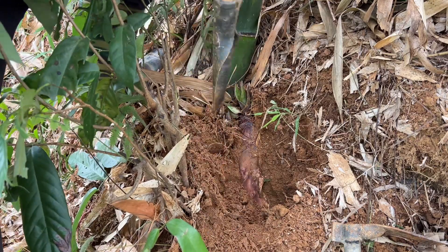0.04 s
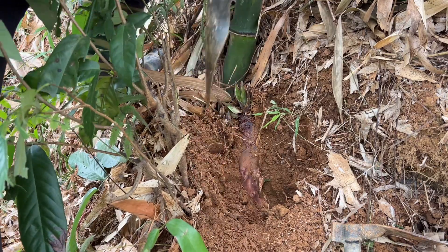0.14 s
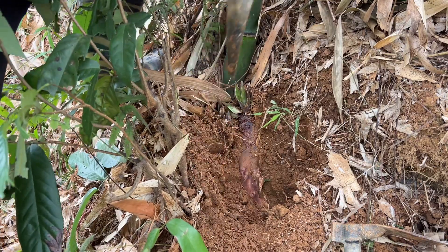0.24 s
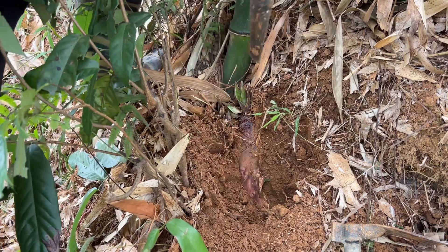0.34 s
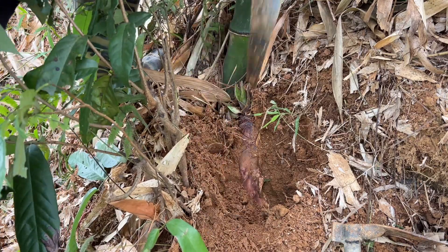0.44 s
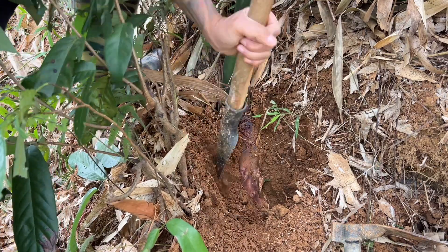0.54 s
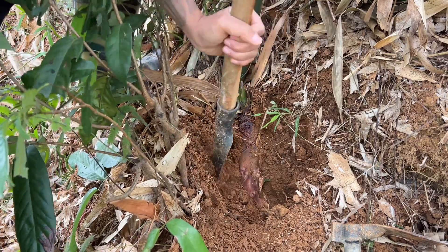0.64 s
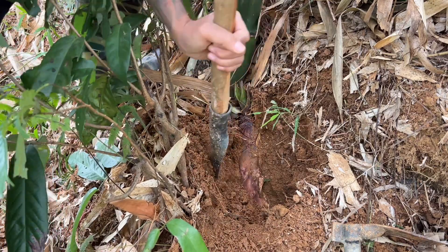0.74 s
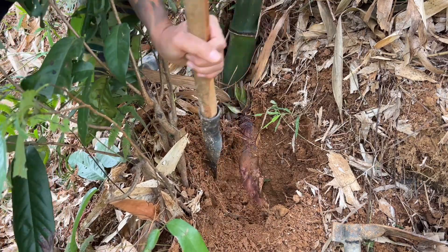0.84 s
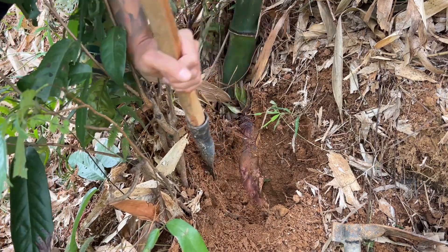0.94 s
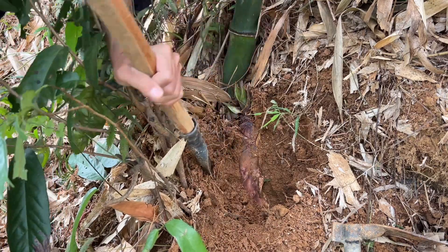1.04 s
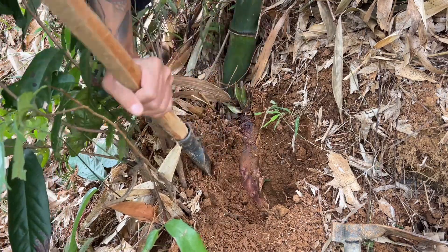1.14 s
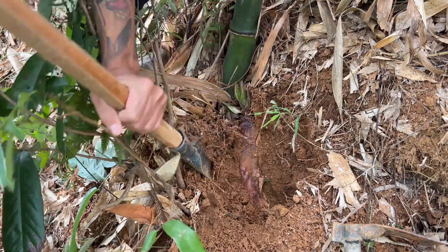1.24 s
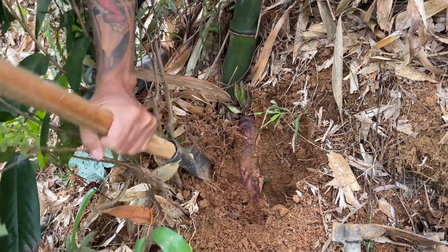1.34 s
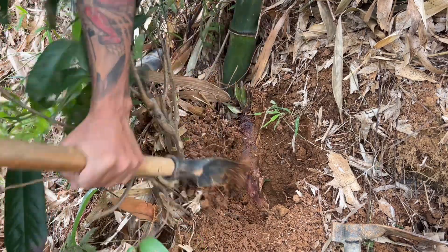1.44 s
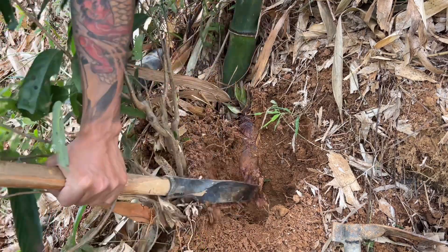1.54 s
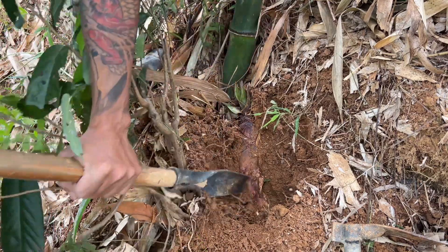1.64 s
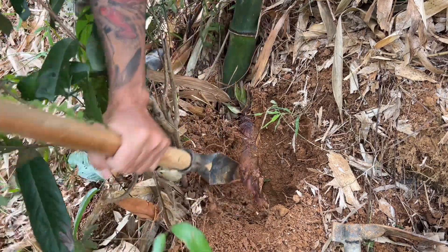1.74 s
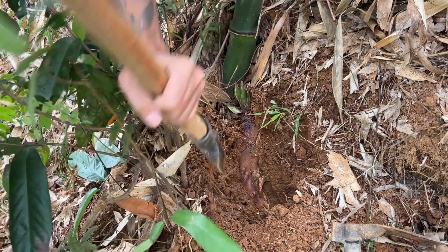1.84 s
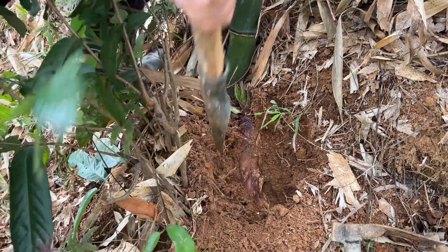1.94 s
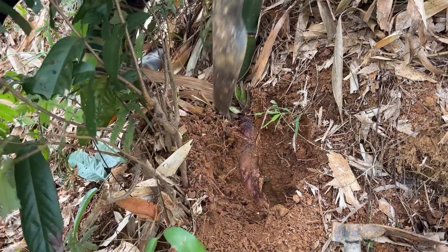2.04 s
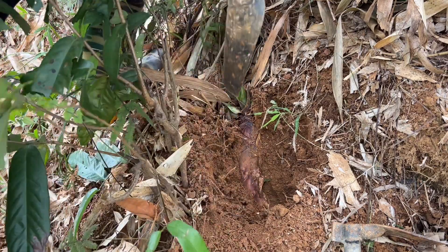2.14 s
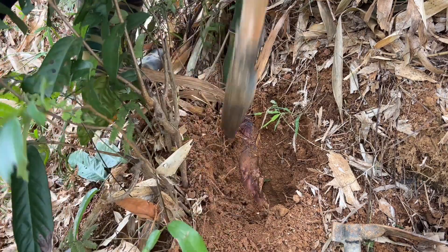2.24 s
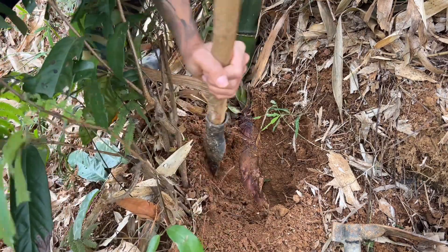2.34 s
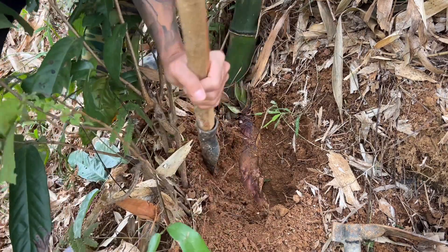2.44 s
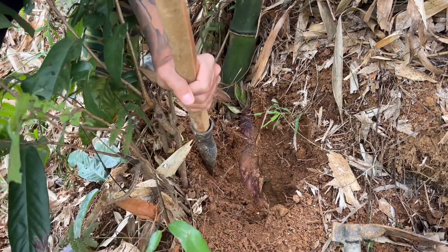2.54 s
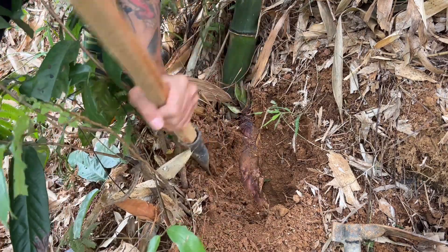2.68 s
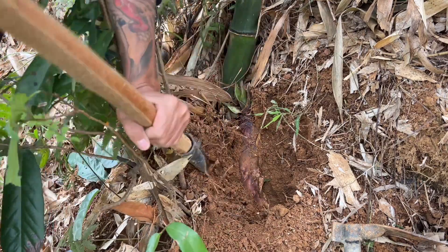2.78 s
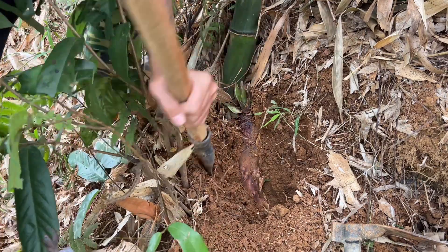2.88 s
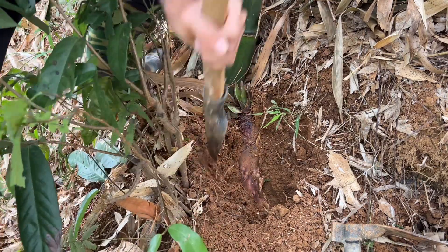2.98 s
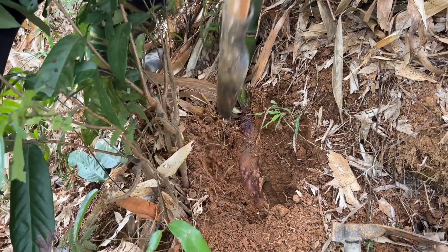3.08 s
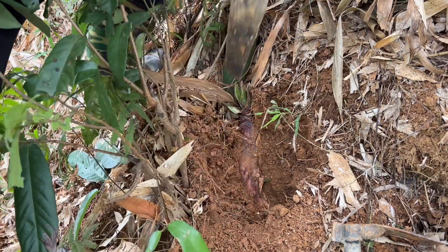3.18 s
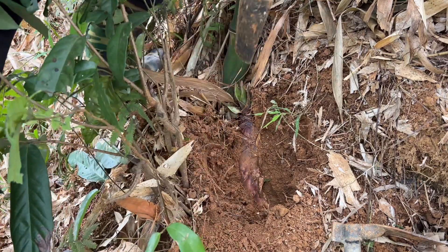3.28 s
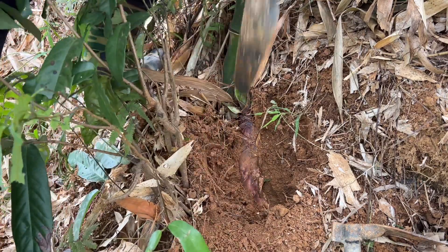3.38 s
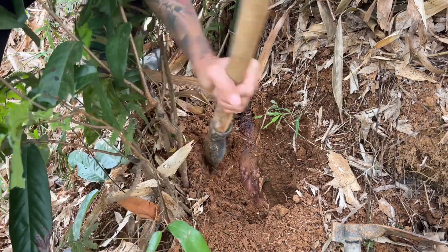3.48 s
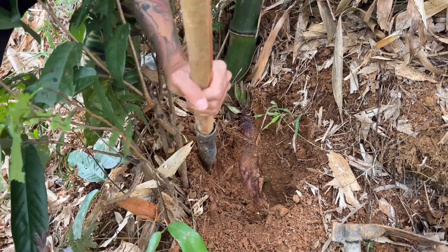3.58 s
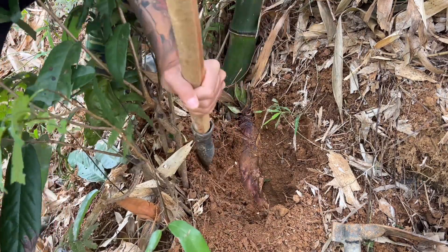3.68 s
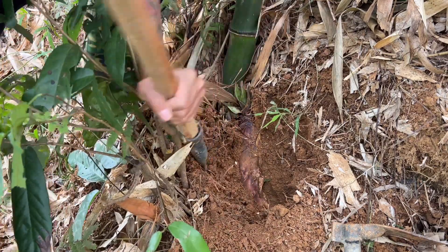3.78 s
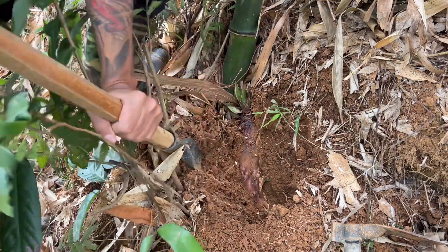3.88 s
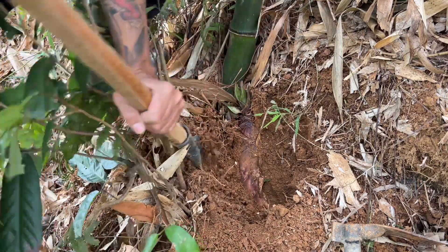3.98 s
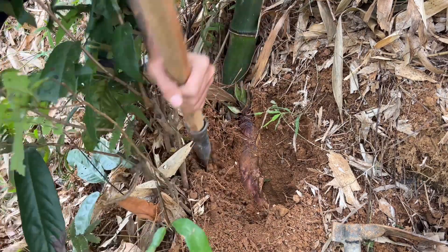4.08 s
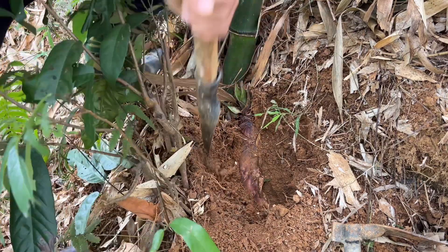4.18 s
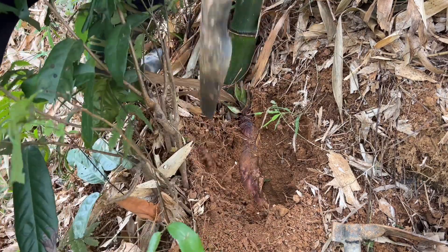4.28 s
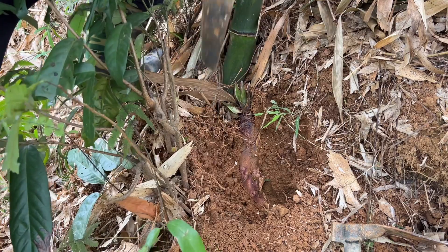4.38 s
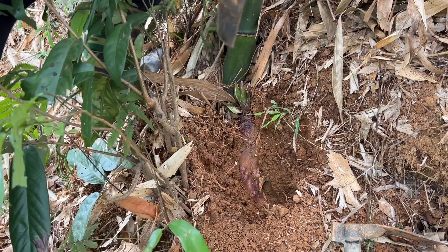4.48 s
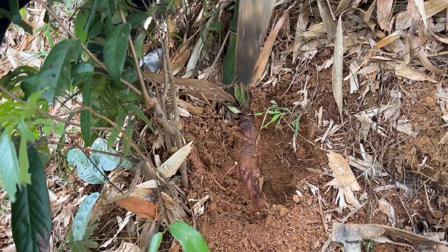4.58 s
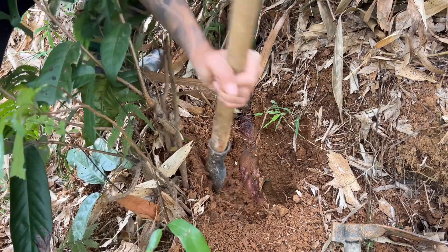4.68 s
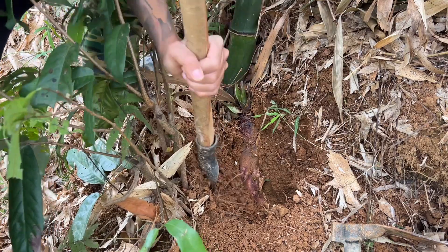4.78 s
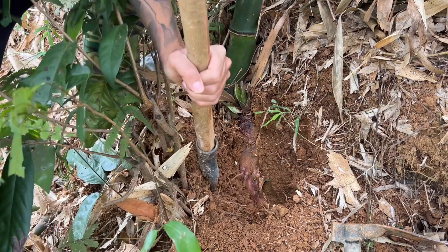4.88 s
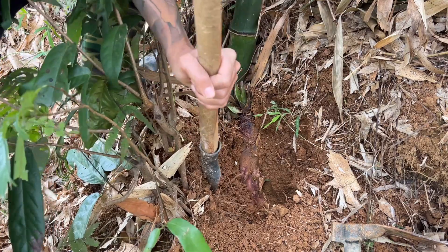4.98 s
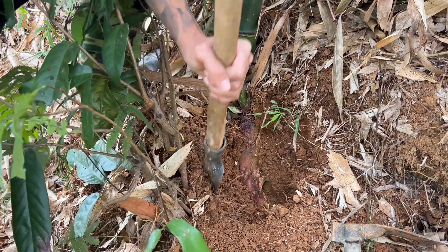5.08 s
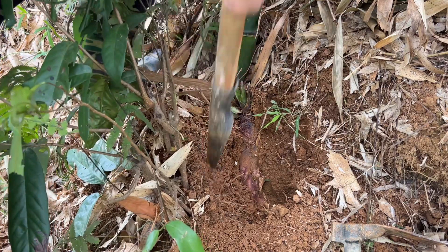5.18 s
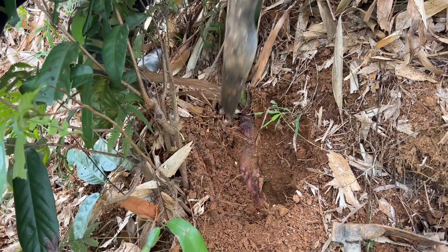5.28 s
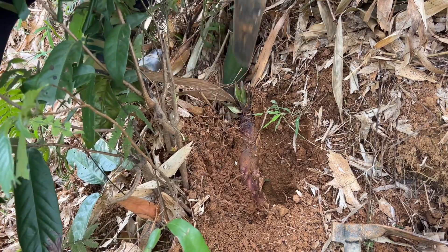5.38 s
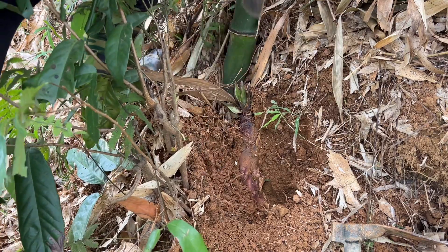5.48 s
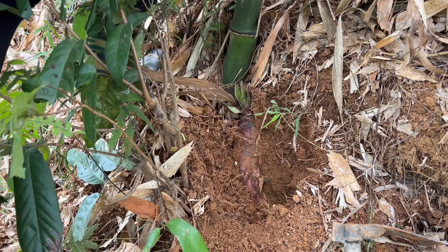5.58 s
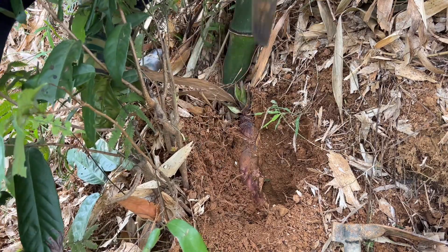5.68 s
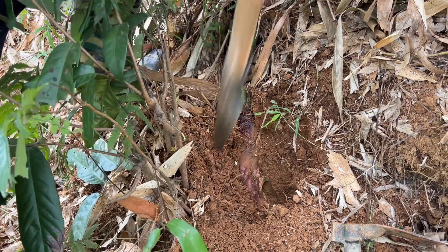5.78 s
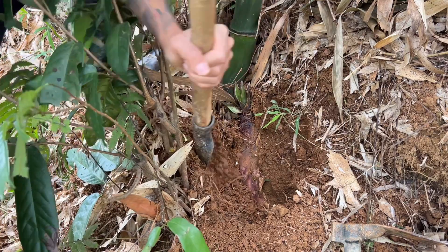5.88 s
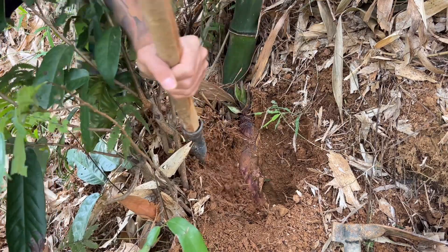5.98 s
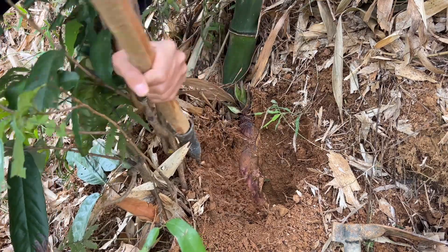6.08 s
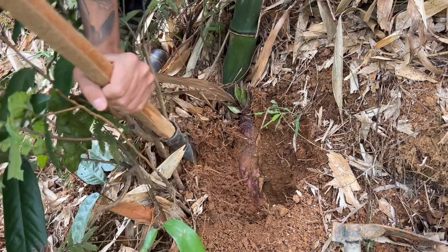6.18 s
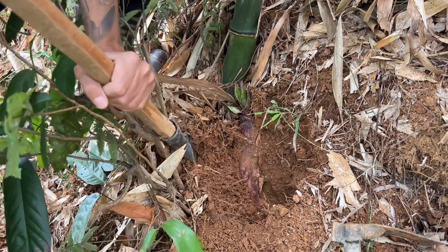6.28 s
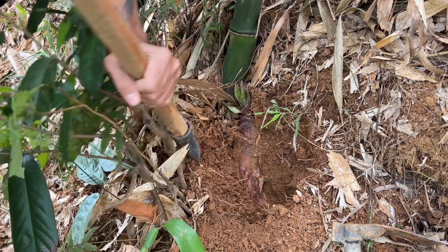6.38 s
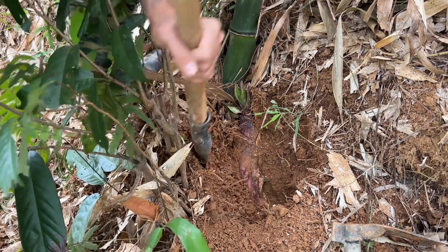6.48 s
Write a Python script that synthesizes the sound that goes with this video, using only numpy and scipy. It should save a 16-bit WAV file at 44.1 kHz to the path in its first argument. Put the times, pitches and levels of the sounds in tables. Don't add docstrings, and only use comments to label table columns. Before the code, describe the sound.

A hand-held stereo microphone is close to a hoe working loose soil in a grove. Faint leaf rustle and low air rumble open it. At 0.6 s the first blow crunches through grit with a crack and low thud; a faint wooden creak follows around 0.7-0.9 s. Around 1.3-1.8 s the blade is levered out: scraping, a strong root snap near 1.5, crumbling earth and crackling leaves. At 2.4 s comes the hardest, sharpest crack, then tearing fibres and knocking clods near 2.8. A quick, solid blow lands at 3.55 s, with scraping and snapping at 3.9 and rustling and faint steel ringing near 4.2 amid stronger rumble. At 4.76 s a lighter, brighter blow catches a root with a small double stop and scrape. The fifth, at 5.9 s, thuds deepest, followed by loud snaps at 6.04 and 6.28 before ending around 6.5 s.

```python
import sys
import numpy as np
from scipy import signal
from scipy.fft import rfft, irfft, next_fast_len
from scipy.io import wavfile
from scipy.ndimage import uniform_filter1d

SR = 44100
rng = np.random.default_rng(int(sys.argv[2]) if len(sys.argv) > 2 else 0)


def dump_mix(stems):
    frames = np.atleast_2d(stems).T
    limited = np.clip(frames, -1, 1)
    pcm = np.round(limited * 32767).astype(np.int16)
    wavfile.write(sys.argv[1], SR, pcm)


def nominal_scale(level):
    x = np.asarray(level, float) / 20
    return 10 ** x


N = 287864

# (stop [s], crack [dB], entry [ms], grit [dB])
BLOWS = [
    (0.6155, -9.5, 11, -23),
    (2.3815, -1, 10, -22),
    (3.5499, -7, 7.9, -20),
    (4.7572, -11, 10.5, -26),
    (5.9021, -3.5, 13.2, -21.5),
]
# (frequency [Hz], level [dB], t60 [s], delay [ms])
CRACK_MODES = [(640, -6, .04, -.15), (800, -6, .025, -.1), (1250, -10, .01, -.4), (3000, -13, .006, -1.6),
               (6200, -15, .005, -.6)]
# (level [dB], ..)
STRUCK = [(-5, 3, 2.5, -10, -14), (0.5, -6, -3, -7.5, -3), (4.5, -0.5, 6.5, -14.5, 6), (-6, -12, -4, 11, 3),
          (-4.5, -1.5, -2, 1.5, -20)]
# (frequency [Hz], level [dB])
SQUEALS = [(2800, -26), (1900, -12), (2170, -18), (2060, -19.5), (1850, -15.5)]
# (frequency [Hz], density [dB per Hz])
GRIT_SPECTRUM = [(300, -44.5), (800, 3), (2000, -1.5), (3000, 0.5), (4500, -6), (7000, -6.5), (10500, -4),
                 (16000, -23)]
# (frequency [Hz], arrival [ms], swell [ms], level [dB])
THUD_WAVES = [(325, 2.76, 3.7, -4.5), (225.4, 3.25, 5, 0.5), (420, 1.2, 2.2, -3.0)]
# (frequency [Hz], arrival [ms], swell [ms], level [dB])
GROUND_WAVES = [(81, 21.3, 10.0, -1), (127, 9.3, 5.5, -3.5), (70, 52.5, 14.5, -12), (52, 15.5, 15.5, -13)]
# (thud [dB], thud pitch [ratio], ground wave [dB], crack pitch [ratio], upper thud [dB])
ANSWERS = [(-18.5, 1.0, -22.5, 1.1, -3), (-15, 1.0, -19.5, 1.016, 0.5), (-16, 1.12, -17, 1.07, 3),
           (-19, 1.09, -24, 1.02, 1.5), (-8.5, 0.91, -19, 0.99, -3.5)]
# (thud delay [ms], thud swell [ratio], ground delay [ms], soil grips blade [ms])
UNFOLDING = [(.3, 1.05, -.2, 4.2), (-.2, .95, -.3, 3.4), (-.1, 1.05, .9, 4.4), (-4.5, .9, 13, 3.2),
             (-.2, .75, -.5, 4.0)]
# (frequency [Hz], arrival [ms], swell [ms], level [dB])
ROOT_STOP_WAVES = [(125, .2, 6.5, -21.5), (300, 10.5, 4.5, -29)]
ROOT_STOP_S = 4.764

# (start [s], length [s], level [dB], dullness [0-1], slips [per s])
SCRAPES = [(0.007, 0.15, -55, 0.5, 0), (1.342, 0.082, -48, 0, -9), (1.476, 0.037, -35.5, 0.5, 0),
           (1.533, 0.01, -35, 0.62, 0), (1.551, 0.038, -37, 0.3, 0), (1.59, 0.03, -45, 0.3, 0),
           (2.758, 0.044, -44, 0.19, 0), (2.924, 0.058, -52.5, 0, -5), (3.868, 0.02, -38, 0.42, 8),
           (3.9, 0.044, -42.5, 0.38, 0), (4.759, 0.02, -37, 0.5, 0), (1.645, 0.05, -49, 0.35, 0),
           (4.055, 0.045, -49, 0.3, 0), (4.18, 0.07, -54, 0.4, 0), (2.995, 0.06, -57, 0.5, 0),
           (4.68, 0.04, -50, 0.6, 0), (3.336, 0.016, -56, 0.1, 0), (4.793, 0.039, -39.5, 0.56, 61),
           (4.846, 0.024, -44, 0.57, 5), (5.662, 0.11, -54, 0, 9), (6.204, 0.1, -50.5, 0.05, -6)]
# (time [s], peak [dB], frequency [Hz], treble re peak [dB])
ROOTS = [(0.088, -42.5, 1220, -14), (0.252, -42, 1410, -17), (0.419, -42, 1050, -11),
         (0.805, -43.5, 1430, -1), (0.893, -36.5, 2580, 1), (1.351, -32, 1750, 1), (1.454, -31.5, 2000, 13),
         (1.484, -15.5, 1580, -20), (1.539, -24.5, 1170, -4), (1.825, -26, 2350, -2), (2.351, -55, 1880, 3),
         (2.46, -47, 600, -9), (2.655, -45, 2080, -21), (2.725, -36, 2070, 4), (2.762, -25, 1290, -9.5),
         (2.809, -24.5, 1310, -12), (3.59, -32.5, 2190, 3), (3.8713, -21.5, 2600, 9),
         (3.9025, -29, 2500, -7), (3.984, -35.5, 630, -16), (4.305, -42.5, 2130, -11),
         (4.556, -46.5, 580, 17), (4.692, -50, 626, -26), (2.226, -44.5, 546, -19), (4.969, -38, 586, 15.5),
         (5.39, -44.5, 655, -22), (5.553, -38, 1770, -16), (5.84, -34.5, 1700, -16),
         (6.042, -16.5, 1950, 7), (6.2793, -18, 2100, -4), (6.0435, -17.5, 1070, -8),
         (6.0425, -25, 486, -15), (1.826, -38.5, 680, -10), (4.807, -29, 1900, -4),
         (6.2808, -28, 4900, -11), (4.708, -44, 1600, -12), (5.936, -34, 3300, -2)]
# (time
# [s], peak [dB], frequency [Hz])
LITTER_TICKS = [(0.02, -34, 5030), (0.501, -39.5, 7000), (1.007, -28.5, 8750), (1.144, -41, 2730),
                (1.327, -31, 9000), (1.411, -32, 8000), (1.571, -31, 4630), (1.695, -35, 7600),
                (2.129, -43.5, 4800), (2.33, -31, 4000), (2.56, -44, 3200), (2.827, -27, 8700),
                (2.867, -42, 4640), (2.903, -36.5, 4100), (3.007, -46, 3130), (3.342, -47, 4220),
                (3.815, -47, 3000), (4.047, -28.5, 8300), (4.169, -38, 4240), (4.806, -22.5, 4900),
                (5.061, -39.5, 4500), (4.851, -39, 2900), (5.422, -41, 7300), (5.656, -37.5, 7600),
                (6.208, -43, 8400), (6.241, -34.5, 3800), (6.321, -39, 8100), (2.088, -45, 5280),
                (2.18, -51.5, 7800), (2.315, -48, 3570), (2.353, -34, 7000), (2.509, -49, 5000),
                (2.456, -47, 7500), (3.909, -37, 2500), (3.988, -38, 3300), (4.101, -36.5, 4500),
                (4.112, -40, 2700), (4.156, -40, 2960), (1.477, -30.5, 4800), (1.54, -27.5, 5270),
                (1.503, -35, 3200), (3.652, -43.5, 3130), (3.746, -50, 3830), (2.18, -61, 4000),
                (2.7575, -38, 3600), (2.7665, -34, 3800), (2.7685, -36, 3500), (2.7728, -28, 3700),
          (2.7782, -31, 2200), (2.7839, -30, 2800), (2.7895, -33, 2600), (2.7955, -33, 4300),
          (2.8063, -30, 2600), (3.168, -50, 4200), (3.348, -47, 6000), (3.42, -52, 5000),
          (1.518, -38, 5200), (1.555, -36, 4800), (1.563, -35, 2100), (1.59, -39, 5000), (1.604, -39, 4900),
          (1.613, -40, 3200), (1.624, -41, 5500), (1.668, -43, 2600), (1.711, -41, 3300),
          (1.719, -42, 4200), (1.772, -42, 7500), (1.796, -41, 7000), (3.994, -39, 1300),
          (4.267, -47, 1270), (4.77, -32, 3500), (4.82, -40, 900), (6.126, -42, 1300), (6.165, -44, 1700)]
# (time [s], length [s], level [dB], tilt [dB per octave], ring time [share of free])
BRUSHES = [
    (1.482, 0.022, -58, -12, 0.27),
    (3, 0.03, -76, 5, 1),
    (4.144, 0.05, -74, 3, 0.68),
    (5.2, 0.023, -73, 9, 0.63),
]
# (frequency [Hz], level [dB], t60 [s], onset [share of the brush])
BLADE_MODES = [(1080, -6, 0.021, 0.022), (1800, -4, 0.033, 0.075), (2123, 1, 0.1, .7), (2940, -2, .04, 0.8),
               (3130, 1, 0.04, 0.067), (3420, -10, 0.03, 0.6), (4493, -8, 0.022, 0.16),
               (4970, -13, .022, 0.5)]
# (time [s], frequency [Hz],
# length [ms], level [dB])
SINGING = [(1.497, 3150, 20, -40), (1.505, 2120, 15, -41), (1.5, 1080, 14, -42), (1.484, 5000, 6, -36),
           (2.8083, 1300, 3.5, -27), (3.007, 3350, 4, -50), (3.011, 3200, 15, -53), (3.009, 1950, 7, -53),
           (3.009, 1300, 4, -53), (3.028, 2123, 36, -54), (3.031, 2930, 13, -54), (3.038, 4230, 8, -57),
           (3.052, 3000, 10, -59), (4.157, 5200, 12, -56), (4.168, 4480, 6, -44), (4.168, 3130, 6, -45),
           (4.175, 2123, 15, -51), (4.203, 2123, 25, -52), (4.196, 3050, 19, -53), (4.21, 4250, 14, -56),
           (4.222, 4900, 18, -57), (4.198, 1800, 20, -57), (4.706, 1560, 7, -47), (4.805, 1100, 5, -38),
           (4.966, 600, 8, -48), (5.196, 4300, 8, -58), (5.206, 2123, 30, -53), (5.2, 2900, 8, -58),
           (5.215, 2930, 11, -51), (5.216, 3450, 11, -53), (5.209, 4900, 8, -56), (5.222, 5600, 4, -55),
           (5.23, 4650, 9, -56), (5.231, 5050, 9, -56), (5.226, 3180, 9, -57)]
# (time [s], peak [dB])
CREAKS = [(0.707, -44.5), (0.737, -45), (0.782, -43), (0.808, -38), (0.835, -38.5), (0.855, -41),
          (0.877, -38), (0.899, -44)]
# (frequency [Hz], level [dB], t60 [s])
HANDLE_MODES = [(392, 9, 0.037), (248, -5.5, .025), (160, -6, .03)]

# (time [s], level [dB])
STIR = [(0.0, -74), (0.1, -63.5), (0.3, -68.5), (0.88, -66.5), (1.3, -62.5), (1.55, -56), (1.7, -62),
        (1.85, -57), (2.05, -72), (2.7, -68.5), (2.92, -62), (3.2, -71), (3.8, -69), (4.0, -58), (4.5, -68),
        (5.55, -68.5), (5.9, -64), (6.53, -66)]
# (middle [s], half length [s], rubbing [dB], crumbling re rubbing [dB])
PRYING = [(0.04, 0.051, -70.5, 12), (0.84, 0.075, -61, -44), (1.365, 0.0095, -54, -9),
          (1.556, 0.07, -51.5, -2), (1.948, 0.28, -71, 4), (2.23, 0.19, -75.5, 14), (2.784, 0.037, -58, 14),
          (3.02, 0.021, -59.5, 1), (3.816, 0.043, -57.5, -46.5), (3.956, 0.057, -49, 1.5),
          (4.103, 0.07, -65, 14), (4.607, 0.055, -69, 6.5), (5.186, 0.082, -61.5, 6.5),
          (5.439, 0.035, -72, 12), (6.064, 0.15, -52.5, -35), (6.304, 0.087, -58, -4),
          (3.385, 0.04, -66, 5), (6.488, 0.036, -64.5, 11.5)]
# (frequency [Hz], density [dB per Hz])
RUSTLE_SPECTRUM = [(900, -4.5), (2000, -1.5), (3300, -1), (5200, -4.5), (7000, -6.5), (10000, 1.5),
                   (13000, -9), (16000, -8)]
# (frequency [Hz], density [dB per Hz])
CRUMBLE_SPECTRUM = [(150, -10), (350, 0.5), (700, -1.5), (1200, -11), (2200, -6.5), (4000, -15.5),
                    (8000, -42.5)]
# (time [s], level [dB])
BREEZE = [(0, -59), (.5, -58.5), (1.1, -62.5), (1.8, -67.5), (2.5, -64), (3.0, -59.5), (3.38, -67),
          (3.75, -53.5), (4.1, -40), (4.6, -53.5), (5.05, -56.5), (5.8, -53), (6.3, -43)]
# (middle [s], half length [s], level [dB], knocking re rumble [dB])
PUFFS = [(0.003, 0.049, -47.5, -25), (0.193, 0.057, -65, -24), (0.347, 0.034, -47, -28),
         (0.82, 0.016, -46, -12), (0.881, 0.037, -44, -9), (1.373, 0.014, -53.5, -0.5),
         (1.524, 0.065, -50, -5), (1.99, 0.041, -59, -3), (2.281, 0.038, -42.5, -21),
         (2.555, 0.048, -50.5, -33), (2.797, 0.032, -56.5, 1), (2.88, 0.029, -52.5, -9),
         (3.104, 0.011, -37, -23), (3.2, 0.058, -51, -36.5), (3.475, 0.03, -55, -34),
         (3.89, 0.022, -32, -15), (4.007, 0.046, -46.5, 0), (4.22, 0.084, -35.5, -9.5),
         (4.437, 0.013, -34.5, -34), (4.529, 0.0095, -41, -31), (4.641, 0.026, -43, -13),
         (4.906, 0.024, -45, -13), (5.182, 0.043, -40.5, -9.5), (5.314, 0.03, -39, -12),
         (5.444, 0.02, -37.5, -4), (5.581, 0.012, -42, -30), (5.67, 0.021, -50, -15),
         (6.082, 0.038, -35.5, -13), (6.259, 0.089, -38, -2.5), (6.494, 0.11, -42.5, -17)]
# (frequency [Hz], density [dB per Hz])
RUMBLE_SPECTRUM = [(15, -21.5), (30, -23), (45, -1), (60, -0.5), (85, -6), (120, -20.5), (200, -49.5),
                   (400, -70.5)]
# (frequency [Hz], density [dB per Hz])
KNOCKING_SPECTRUM = [(50, -34), (90, -2.5), (130, 10), (190, -7), (300, -24), (600, -56.5)]
# (frequency [Hz], density [dB per Hz])
RUBBING_SPECTRUM = [(100, -35), (200, -2.5), (300, -0.5), (430, -9), (560, -12.5), (900, -46)]
# (frequency [Hz], left lead [half turns])
STEREO_LEAD = [(0, 0), (900, .2), (2900, .55), (4400, .25), (6200, .2), (7000, 0), (7600, 0), (8300, -.35),
               (9300, -1), (11000, -1), (12500, -2), (14400, -2), (15200, -2.45), (16500, -2.7)]
# (frequency [Hz], left over right [dB], share from all around [dB])
STEREO_BALANCE = [(60, .2, -22), (250, .3, -17), (1000, 4.1, -9), (2500, 2.5, -8), (5000, 4.5, -8),
                  (6400, 2.1, -12), (7000, 0, -40), (7600, 0, -40), (8400, .6, -14), (9300, 0, -90),
                  (16000, 0, -90)]


def blows():
    out, ms = np.zeros(N), np.arange(-30, 170, 1000 / SR)
    after = np.maximum(ms, 0)
    luck = rng.standard_normal((len(BLOWS), len(ms)))
    each_blow = zip(BLOWS, SQUEALS, ANSWERS, STRUCK, UNFOLDING, luck)
    for blow, (squeal_hz, squeal_db), answer, struck, unfolding, noise in each_blow:
        s, crack_db, entry_ms, grit_db = blow
        thud_db, pitch, ground_db, crack_pitch, upper_db = answer
        thud_late_ms, swell, ground_late_ms, grip_ms = unfolding

        entering = np.clip((ms + entry_ms) / 0.23, 0, 1) * nominal_scale(12.4 * np.minimum(ms, 0) / entry_ms)
        dying = 1.02 * np.exp(-(after / 3.63) ** 2) + 0.5 * np.exp(-after / 7.1)
        crunch = entering * (dying + 0.033 * np.exp(-after / 60.0))
        squeal = entering ** 1.7 * np.exp(-after / 0.86)
        squeal = squeal * np.cos(2 * np.pi * squeal_hz * (ms - .2) / 1000)

        crack = 0
        for (hz, level_db, t60, late_ms), struck_db in zip(CRACK_MODES, struck):
            since = ms - late_ms
            chatter = .06 * noise * (since > 0) * np.exp(-np.abs(since) / 1.2)
            jolt = (np.abs(since) < 500 / SR) + chatter
            crack = crack + nominal_scale(level_db + struck_db) * ring(jolt, hz * crack_pitch, t60)
        gripped = np.exp(-(after / grip_ms) ** 3)

        stretched_ms = 9 + (ms - thud_late_ms - 9) * pitch
        thud = nominal_scale(upper_db) * soil_waves(THUD_WAVES[:1], stretched_ms, swell)
        thud = thud + soil_waves(THUD_WAVES[1:], stretched_ms, swell)
        ground = soil_waves(GROUND_WAVES, ms - ground_late_ms)

        piece = nominal_scale(crack_db) * crack * gripped
        piece += nominal_scale(grit_db) * crunch * colour(noise, GRIT_SPECTRUM)
        piece += nominal_scale(squeal_db) * squeal
        piece -= nominal_scale(thud_db) * thud + nominal_scale(ground_db) * ground
        add(out, s + ms[0] / 1000, piece)
    add(out, ROOT_STOP_S + ms[0] / 1000, -soil_waves(ROOT_STOP_WAVES, ms))
    return out


def soil_waves(waves, ms, share=1):
    out = 0
    for hz, arrival_ms, swell_ms, level_db in waves:
        age_ms = np.maximum(ms - arrival_ms, 0)
        turn = age_ms / (share * swell_ms)
        swell = turn * np.exp(.5 - .5 * turn ** 2)
        out = out + nominal_scale(level_db) * swell * np.sin(2 * np.pi * hz * age_ms / 1000)
    return out


def scrapes():
    t, bright, dull = np.arange(N) / SR, 0, 0
    unsteady = 0.26 * drift(40.0)
    for s, length, level_db, dullness, slips in SCRAPES:
        since = np.maximum(t - s, 0)
        slipping = 1
        if slips > 20:
            slipping = .35 + 2.6 * np.exp(-5 * ((since * slips + unsteady) % 1))
        stroke = np.minimum(since / 0.0016, 1) * np.exp(-(since / length) ** 4)
        stroke = nominal_scale(level_db) * stroke * slipping
        bright = bright + (1 - dullness) * stroke
        dull = dull + dullness * stroke
    surge = nominal_scale(1.8 * drift(74.0))
    hiss = colour(grains(3000 * surge, 4.0, smooth=0.79), RUSTLE_SPECTRUM)
    fine = hiss + 0.39 * crumbs(1500 * surge, 3100, 8200, cycles=8.6)
    return bright * fine + dull * crumbs(900 * surge, 1100, 4000, cycles=3.2)


def crumbs(per_s, low_hz, high_hz, cycles):
    clicks = grains(per_s, 1.6, smooth=0)
    size_class = rng.integers(0, 12, N)
    pitches = np.geomspace(low_hz, high_hz, 12)
    return rms_one(sum(ring(clicks * (size_class == k), hz, cycles / hz) for k, hz in enumerate(pitches)))


def snaps():
    out, ms = np.zeros(N), np.arange(-4, 30, 1000 / SR)
    # (treble [dB], decay [ms], height of the clean click over its burst)
    breaks = [(*row, 1.7, 2.2) for row in ROOTS]
    breaks += [(*row, -7, 2.1, .8) for row in LITTER_TICKS]
    luck = rng.standard_normal((len(breaks), len(ms)))
    treble = signal.butter(1, 3000, "high", fs=SR, output="sos")
    for (s, peak_db, hz, treble_db, decay_ms, clean), noise in zip(breaks, luck):
        shape = np.where(ms < 0, 0.18 * np.exp(ms / 2.3), np.exp(-ms / max(decay_ms, .2)))
        burst = noise * shape
        parting = clean * np.exp(-((ms - .3) * hz / 85) ** 2)
        body = np.diff(ring(burst + parting, hz, 4.2 / hz), prepend=0)
        tick = signal.sosfilt(treble, burst)
        snap = body / np.abs(body).max() + nominal_scale(treble_db - 10.5) * tick / np.abs(tick).max()
        add(out, s + ms[0] / 1000, nominal_scale(peak_db) * snap)
    return out


def blade():
    out, ms = np.zeros(N), np.arange(0, 250, 1000 / SR)
    for hz, mode_db, t60, late in BLADE_MODES:
        sliding = grains(480, 0.98, smooth=1.0)
        for s, length, level_db, tilt_db, freedom in BRUSHES:
            since = ms / 1000 - late * length
            touch = (since > 0) * np.exp(-(since / length) ** 2)
            touch = nominal_scale(level_db + tilt_db * np.log2(hz / 2000)) * touch
            push = touch * sliding[round(s * SR):][:len(ms)]
            add(out, s, nominal_scale(mode_db - 7.5) * ring(push, hz, t60 * freedom))
    return out


def singing():
    out, ms = np.zeros(N), np.arange(0, 80, 1000 / SR)
    luck = rng.standard_normal((len(SINGING), 41))
    for (s, hz, length_ms, level_db), chance in zip(SINGING, luck):
        flutter = np.interp(ms, np.arange(41) * 4.0, chance)
        shape = np.minimum(ms / 1.5, 1) * np.exp(-(ms / length_ms) ** 3)
        tone = np.sin(2 * np.pi * hz * ms / 1000 + 0.8 * flutter)
        add(out, s, nominal_scale(level_db + 2.5 * flutter) * shape * tone)
    return out


def creak():
    out, ms = np.zeros(N), np.arange(0, 60, 1000 / SR)
    slip = np.exp(-((ms - 2) / 0.89) ** 2)
    luck = rng.normal(0, 2.1, (len(CREAKS), len(HANDLE_MODES)))
    for (s, peak_db), uneven_db in zip(CREAKS, luck):
        knock = 0
        for (hz, mode_db, t60), own_db in zip(HANDLE_MODES, uneven_db):
            knock = knock + nominal_scale(mode_db + own_db) * ring(slip, hz, t60)
        add(out, s, nominal_scale(peak_db) * knock / np.abs(knock).max())
    return out


def litter():
    stir_db, = in_time(STIR)
    clumps = drift(23.0)
    falling = nominal_scale(-57.5 + 1.8 * drift(27.0)) * settling()
    giving = swells([(s, half, db + crumble_db) for s, half, db, crumble_db in PRYING])
    rustle = colour(grains(2500 * nominal_scale(7.3 * clumps), 4.2, smooth=1.0), RUSTLE_SPECTRUM)
    crumble = colour(grains(500 * nominal_scale(4.5 * clumps), 3.36, smooth=0.73), CRUMBLE_SPECTRUM)
    fine = nominal_scale(stir_db) + nominal_scale(2.0) * falling + nominal_scale(-12.0) * giving
    coarse = nominal_scale(stir_db + 4.0) + falling + giving
    fine_sound = nominal_scale(9.5) * nominal_scale(.5 * clumps) * fine * rustle
    return fine_sound + nominal_scale(-10.0 + drift(30.0)) * coarse * crumble


def settling():
    since = np.arange(N) / SR - np.array(BLOWS)[:, :1]
    lead_in = nominal_scale(-1.5) * np.exp(-np.abs(since) / 0.0366)
    fall = np.exp(-np.abs(since) / 0.077)
    return np.where(since > 0, fall, lead_in).sum(axis=0)


def hand():
    breeze = nominal_scale(in_time(BREEZE)[0])
    puffs = swells([row[:3] for row in PUFFS])
    jolts = swells([(s, half, db + knock_db) for s, half, db, knock_db in PUFFS])
    prying = swells([row[:3] for row in PRYING], edge=1.9)

    blowing = (breeze * nominal_scale(3.0 * drift(14.0)) + puffs) * nominal_scale(2.0 * drift(22.0))
    rumble = blowing * steady_noise(RUMBLE_SPECTRUM, 0.024)
    shaken = nominal_scale(-25.5) * breeze + jolts + nominal_scale(-52.5) * settling()
    knocking = shaken * nominal_scale(0.83 * drift(16.7)) * steady_noise(KNOCKING_SPECTRUM, 0.032)
    rubbed = nominal_scale(-16) * np.sqrt(breeze * nominal_scale(-59.5)) + prying + nominal_scale(-48.0) * settling()
    rubbing = rubbed * nominal_scale(-2.5 + 4.3 * drift(35.0)) * steady_noise(RUBBING_SPECTRUM, 0.025)
    return rumble + knocking + rubbing


def steady_noise(spectrum, span_s):
    x = colour(rng.standard_normal(N), spectrum)
    return x / np.sqrt(uniform_filter1d(x ** 2, round(span_s * SR)) + 0.074)


def swells(rows, edge=2):
    t = np.arange(0, N + 64, 64) / SR
    coarse = sum(nominal_scale(level_db) * np.exp(-np.abs((t - s) / half) ** edge) for s, half, level_db in rows)
    return np.interp(np.arange(N) / SR, t, coarse)


def grains(per_s, spread_db, smooth):
    sizes = nominal_scale(spread_db * np.minimum(rng.exponential(1, N), 5)) * rng.choice([-1, 1], N)
    clicks = sizes * (rng.random(N) < per_s / SR)
    return rms_one(clicks) + smooth * rng.standard_normal(N)


def ring(push, hz, t60):
    r, w = nominal_scale(-60 / (t60 * SR)), 2 * np.pi * hz / SR
    return signal.lfilter([0, np.sin(w)], [1, -2 * r * np.cos(w), r * r], push + 1e-18)


def drift(rate):
    r = np.exp(-80 * np.pi * rate / SR)
    chance = rng.standard_normal(N // 40 + 2002)
    slow = signal.lfilter([1], [1, -2 * r, r * r], chance)[2000:]
    return np.interp(np.arange(N) / 40, np.arange(len(slow)), rms_one(slow))


def colour(x, spectrum):
    size = next_fast_len(len(x))
    hz = np.arange(size // 2 + 1) * SR / size
    return rms_one(irfft(rfft(x, size) * nominal_scale(at_hz(spectrum, hz)), size)[:len(x)])


def at_hz(points, hz, column=1):
    points = np.array(points)
    return np.interp(np.log(hz + 1), np.log(points[:, 0]), points[:, column])


def in_time(rows):
    s, *columns = np.transpose(rows)
    return [np.interp(np.arange(N) / SR, s, c) for c in columns]


def rms_one(x):
    return x / np.sqrt(np.mean(x ** 2) + 1e-20)


def add(out, s, piece):
    at = round(s * SR)
    out[at:at + len(piece)] += piece[:len(out) - at]


def spread(x, around, aside, skew):
    size = next_fast_len(N + 2048)
    hz = np.arange(size // 2 + 1) * SR / size
    lead = np.interp(hz, *np.transpose(STEREO_LEAD))
    lead = np.where(lead > 0, aside, 1 + skew) * lead
    half = nominal_scale(aside * at_hz(STEREO_BALANCE, hz) / 2) * np.exp(.5j * np.pi * lead)
    alike = rfft(x, size)
    unlike = nominal_scale(at_hz(STEREO_BALANCE, hz, column=2)) * rfft(around, size)
    return irfft(np.array([half * (alike + unlike), (alike - unlike) / half]), size)[:, :N]


def scene():
    hits = blows()
    ticks = snaps() + creak() + singing()
    direct = litter() + hand() + blade() + scrapes()
    around = litter() + hand() + scrapes()
    mix = spread(hits, np.roll(hits, 90), aside=0.36, skew=0.092)
    mix = mix + spread(ticks, np.roll(ticks, 60), aside=0.2, skew=0.28)
    return mix + spread(direct, around, aside=1.474, skew=0)


def band_limit(x):
    return signal.sosfilt(signal.butter(12, 16000, fs=SR, output="sos"), x)


def record(dry):
    top_cut = signal.ellip(8, .5, 36, 15900, fs=SR, output="sos")
    low_cut = signal.butter(2, 34, "high", fs=SR, output="sos")
    cut = signal.sosfilt(low_cut, signal.sosfilt(top_cut, dry))
    return band_limit(.95 * np.tanh(cut / .95))


dry = scene()
out = record(dry)
dump_mix(out)
```